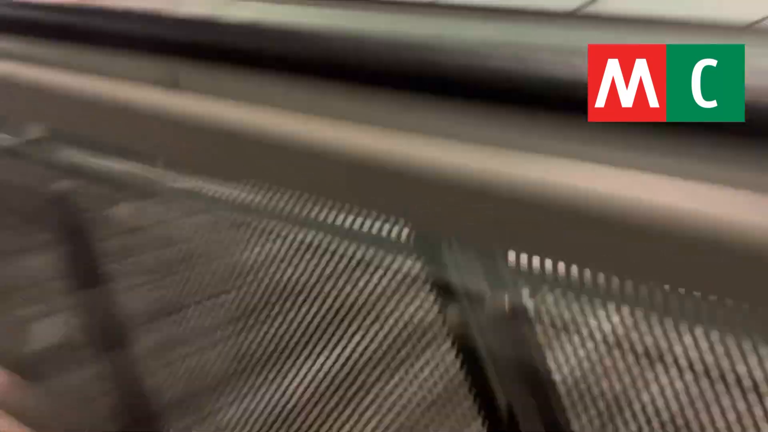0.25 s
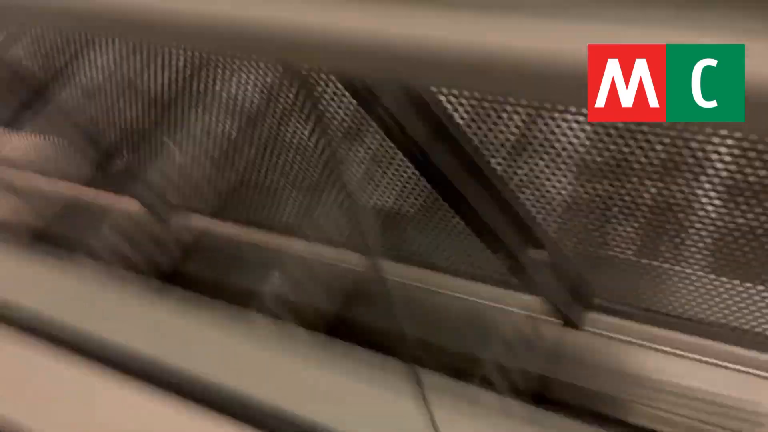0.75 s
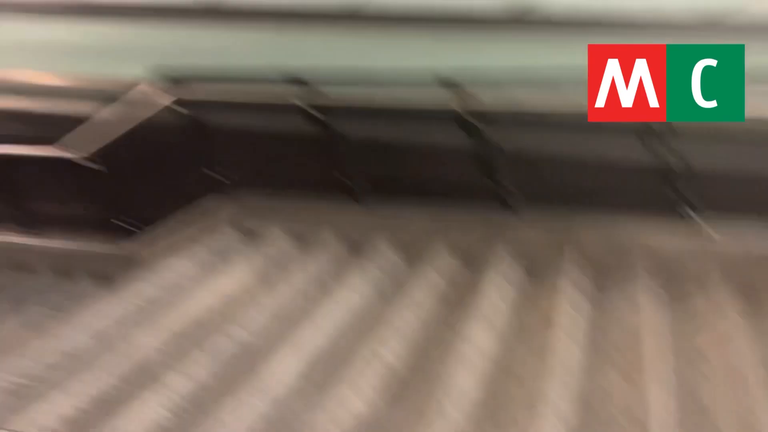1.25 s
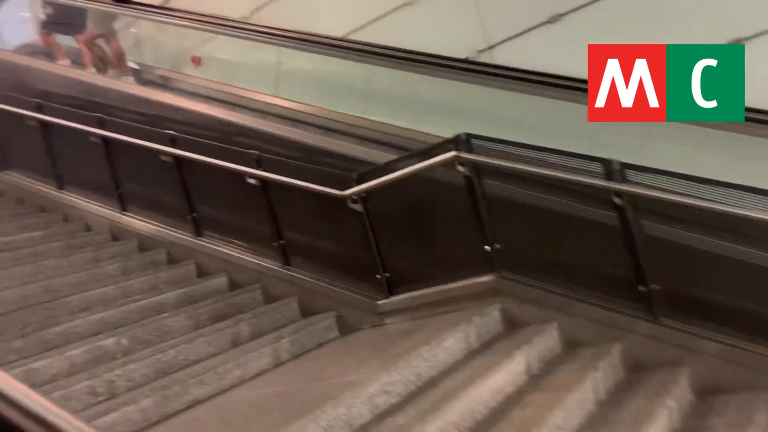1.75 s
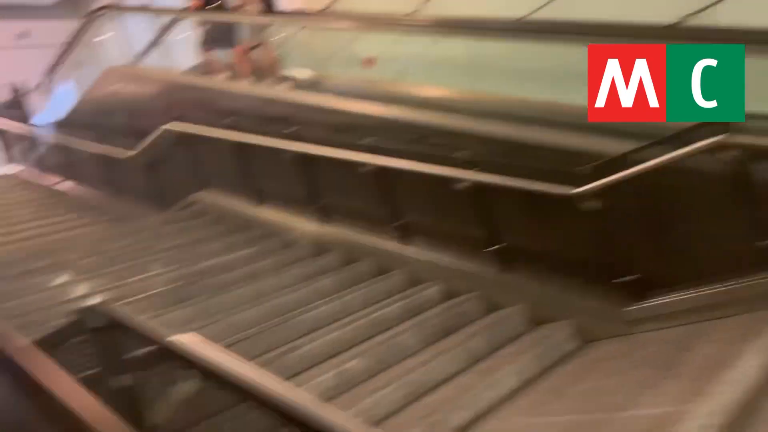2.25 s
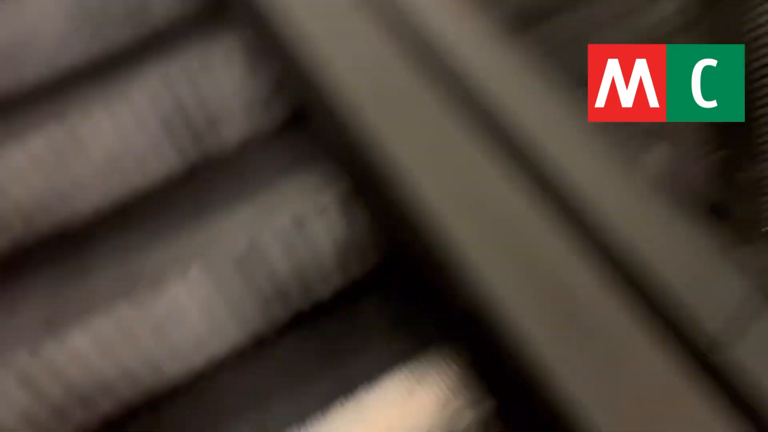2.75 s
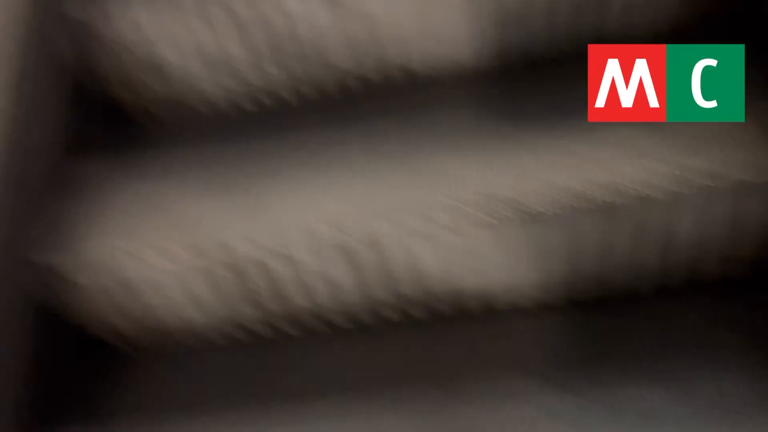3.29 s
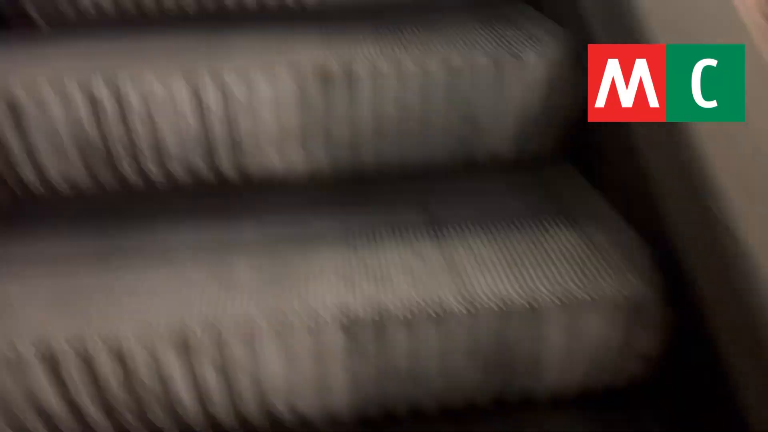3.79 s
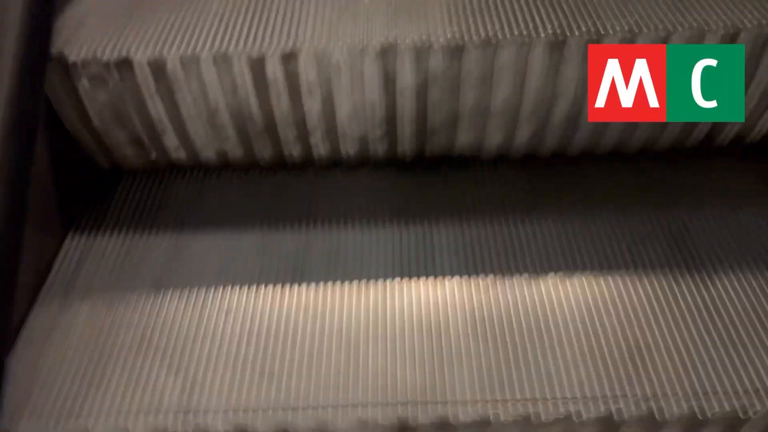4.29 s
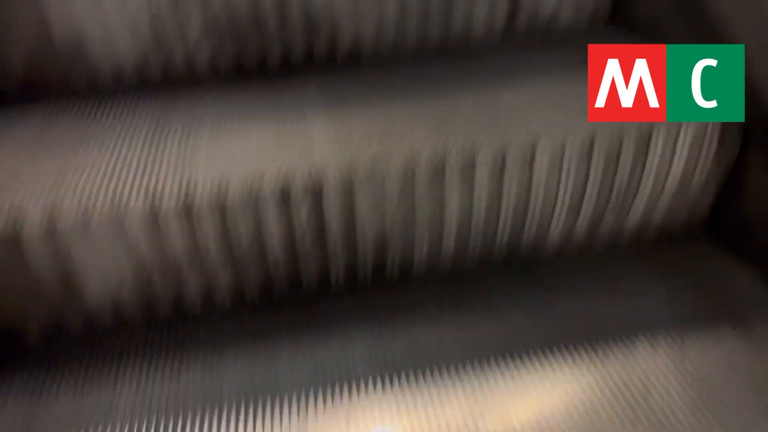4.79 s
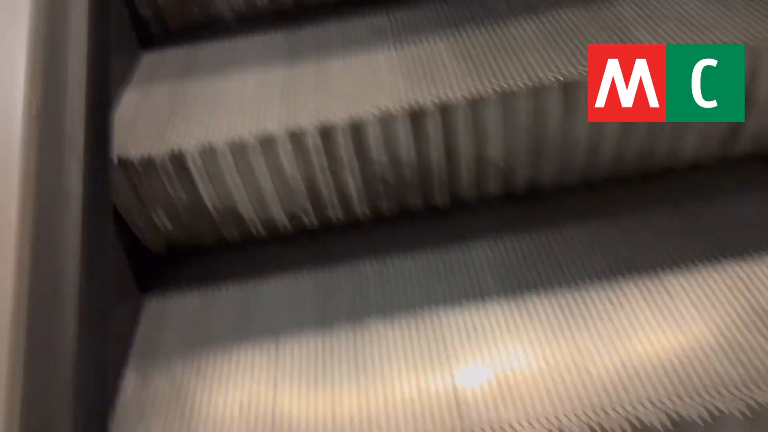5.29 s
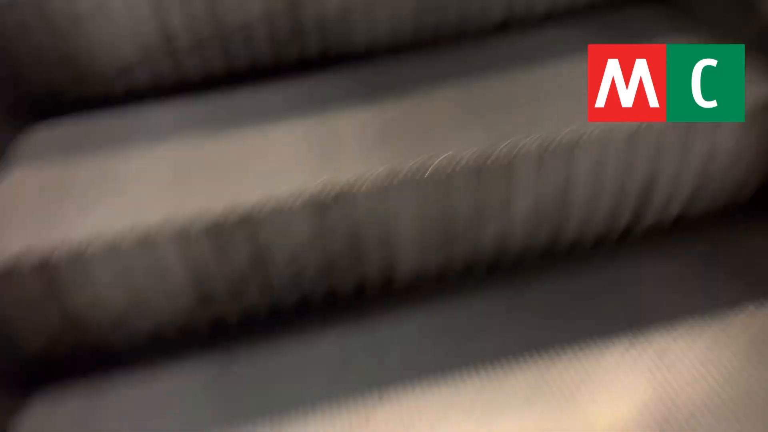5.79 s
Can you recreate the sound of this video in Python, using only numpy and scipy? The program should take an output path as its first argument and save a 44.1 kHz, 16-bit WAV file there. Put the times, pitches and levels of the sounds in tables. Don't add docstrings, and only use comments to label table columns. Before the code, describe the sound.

Close handheld stereo microphone beside, then on, a moving escalator. First come busy, irregular metal ticks over a low throbbing motor-like rumble, dull rolling noise and faint hiss. Then the ticks die away and the deep rumble swells, with isolated hollow metal knocks from the steps and brushes of fine grit. Two strong thuds ring low at the end, with a short dull hall echo.

```python
import sys
import numpy as np
from scipy import signal
from scipy.fft import rfft, irfft, next_fast_len
from scipy.io import wavfile
from scipy.ndimage import uniform_filter1d

SR = 44100
rng = np.random.default_rng(int(sys.argv[2]) if len(sys.argv) > 2 else 0)


def wrap_up_sound(samples):
    columns = np.atleast_2d(samples).T
    tamed = np.clip(columns, -1, 1)
    steps = np.round(tamed * 32767).astype(np.int16)
    wavfile.write(sys.argv[1], SR, steps)


def nominal_scale(level):
    x = np.asarray(level, float) / 20
    return 10 ** x


N = 266349
SIZE = next_fast_len(N + SR)
HZ = np.maximum(np.arange(SIZE // 2 + 1) * SR / SIZE, 1)

# time in seconds, level in dB.
LOAD = [(0, -26.5), (.3, -25), (.8, -24.5), (1.15, -28.5), (1.4, -23), (1.68, -33), (2.0, -28), (2.5, -25),
        (3.0, -22.5), (3.5, -21.5), (3.99, -23.5), (4.45, -18), (4.85, -22), (5.15, -20.5), (5.5, -21.5),
        (5.8, -21), (6.04, -22)]
LOAD_MEAN_DB = -23
# time in seconds, level in dB.
DRIVE_NEAR = [(0, -1), (.3, 2), (.8, 1), (1.2, -5), (1.5, -5), (2.0, -11), (2.3, -2.5), (6.04, -15)]
# start in seconds, peak in dB, colour near 550 Hz in dB,
# colour near 2 kHz in dB, left minus right in dB.
KNOCKS = [(0.1029, -28.5, -7, 3, -5), (0.1845, -17.5, 4, -21, -2.5), (0.1974, -27, -4, -3, -7),
          (0.212, -29, 2, 0, -4), (0.7043, -19.5, -9, -10, -4), (0.7238, -29, -12, -11, 0),
          (2.4294, -32.5, 9, -10, -6), (2.5047, -28, 3.5, -12, -5), (2.9996, -25.5, 3.5, -30, 3),
          (3.6716, -23.5, -12, -3, 1), (3.6808, -33.5, 2, 5, 4), (3.6944, -38, 11.5, 0, -4),
          (4.2121, -25.5, 1, -7, 3), (4.784, -30.5, 16.5, -13, -2), (4.8044, -28, 2, 2.5, 0),
          (5.3587, -9.5, 2.5, -15, -11), (5.3655, -12.5, 7, -9.5, 9.5), (5.39, -26.5, 9.5, -7, 0),
          (5.8469, -19.5, 2.5, 1, 1), (5.8549, -22.5, -6, 0.5, -4), (5.874, -29, 4, -5, 4)]


def rms_one(x):
    return x / np.sqrt(np.mean(x ** 2) + 1e-20)


def at_hz(points, hz, axis=1):
    points = np.array(points)
    return np.interp(np.log(hz), np.log(np.maximum(points[:, 0], 1)), points[:, axis])


def along(rows):
    s, db = np.transpose(rows)
    return np.interp(np.arange(N) / SR, s, db)


def swells(times, rise_db, half_s, slack=0):
    x = (np.arange(0, N + 40, 40) / SR - np.array(times)[:, None]) / np.reshape(half_s, (-1, 1))
    bell = np.exp(-x ** 2) * (1 - slack * x ** 2)
    total_db = (np.array(rise_db)[:, None] * bell).sum(0)
    return np.repeat(total_db, 40)[:N]


def drift(rate):
    r = np.exp(-80 * np.pi * rate / SR)
    chance = rng.standard_normal(N // 40 + 2002)
    slow = signal.lfilter([1], [1, -2 * r, r * r], chance)[2000:]
    return np.interp(np.arange(N) / 40, np.arange(len(slow)), rms_one(slow))


def diffuse(mid, other):
    # frequency in Hz, side minus mid in dB.
    width_rows = [(60, -20), (110, -16.5), (200, -7), (370, -5.5), (690, 1.5), (1260, 3), (1550, 4),
                  (1950, -6.5), (2800, -1), (4280, -2), (6000, 2), (8000, 0), (16000, 8.5)]
    # frequency in Hz, in-phase share, quarter-cycle share.
    port_rows = [(100, 0.058, -0.25), (400, 0, .3), (800, -0.082, .5), (1500, -0.16, .6), (2200, 0.37, -.3),
                 (4500, 0.27, -.3), (6000, 0.2, .2), (9000, 0, 0)]
    in_phase = np.clip(at_hz(port_rows, HZ), -.7, .7)
    quarter = np.clip(at_hz(port_rows, HZ, axis=2), -.45, .45)
    tied = in_phase + 1j * quarter
    side = nominal_scale(at_hz(width_rows, HZ)) * (tied * mid + np.sqrt(1 - np.abs(tied) ** 2) * other)
    return irfft(np.array([mid + side, mid - side]), SIZE)[:, :N]


def roar(spectrum, patchy_db, rate, count):
    mid, other = rfft(rng.standard_normal((2, SIZE))) * nominal_scale(at_hz(spectrum, HZ))
    place = np.interp(np.log(HZ), np.log([spectrum[1][0], spectrum[-1][0]]), [0, count - 1])
    out, together = 0, drift(rate)
    for k in range(count):
        share = np.clip(1 - np.abs(place - k), 0, 1)
        flicker = nominal_scale(patchy_db * (0.45 * together + drift(rate)))
        out = out + flicker * diffuse(share * mid, share * other)
    return out / np.sqrt(np.mean(out.mean(0) ** 2))


def evened(x, window_s, share):
    level = np.sqrt(uniform_filter1d(x.mean(0) ** 2, int(window_s * SR)) + .02)
    x = x / level ** share
    return x / np.sqrt(np.mean(x.mean(0) ** 2))


def truss():
    # frequency in Hz, density in dB per Hz.
    rumble_rows = [(15, -49), (27, -24), (38, -15), (50, -3.5), (62, 0), (74, 1), (86, -4), (100, -2),
                   (115, -10), (140, -17.5), (200, -40), (370, -100)]
    # time in seconds, rise in dB.
    heave_rows = [(.03, 7), (.22, 3), (1.09, 5.5), (1.24, 10), (1.31, 7), (1.75, 14), (3.82, 7), (4.09, 4),
                  (4.29, 5), (4.46, 4.5), (4.61, 3), (4.93, 7.5), (5.16, 3), (5.65, 2), (5.87, 6),
                  (5.95, 3)]
    heave_db = swells(*np.transpose(heave_rows), half_s=0.028, slack=1.5)
    rumble = roar(rumble_rows, patchy_db=0.0, rate=1.5, count=3)
    return nominal_scale(along(LOAD) + heave_db) * evened(rumble, window_s=0.088, share=0.71)


def shaking_db():
    knock, half_s = np.array(KNOCKS), 0.042
    rise_db = 1.5 + 0.07 * (knock[:, 1] - LOAD_MEAN_DB)
    return swells(knock[:, 0] + half_s, rise_db, half_s)


def rollers():
    # frequency in Hz, density in dB per Hz.
    rolling_rows = [(70, -13.5), (110, -3), (135, -0.5), (158, -2), (185, 0), (248, -5), (468, -8.5),
                    (562, -11.5), (801, -15), (985, -16.5), (1390, -22), (1930, -25.5), (2500, -38),
                    (5280, -120)]
    level_db = -26.5 + 0.05 * along(DRIVE_NEAR) + 0.78 * shaking_db()
    return nominal_scale(level_db) * roar(rolling_rows, patchy_db=1.18, rate=19.7, count=8)


def handrail():
    # frequency in Hz, density in dB per Hz.
    hiss_rows = [(1180, -21.5), (2000, -4.5), (3330, -8), (3810, -10), (4130, -7.5), (4330, -10),
                 (5780, -16.5), (8000, -20.5), (10400, -49), (17600, -120)]
    level_db = -46 + 0.13 * (along(LOAD) - LOAD_MEAN_DB) + shaking_db()
    return nominal_scale(level_db) * roar(hiss_rows, patchy_db=1.0, rate=22.0, count=5)


def comb():
    # frequency in Hz, density in dB per Hz.
    grit_rows = [(5000, -34), (7500, -1.5), (9000, 3), (11000, -6), (12500, -2.5), (14000, -5.5),
                 (15700, -8), (16500, -43)]
    # time in seconds, rise in dB, half length in seconds.
    brush_rows = [(1.09, 2, .02), (2.47, 6, 0.017), (3.5, 0.5, 0.045), (3.72, 5, .05), (3.824, 5, .04),
                  (4.09, 3, .04), (4.237, 2, 0.045), (4.61, 2, .03), (4.76, 2.5, .06), (4.932, 5.5, 0.12),
                  (5.1, 4, 0.071), (5.62, 10, .015), (5.948, 3.5, 0.17)]
    extra_db = along(LOAD) - LOAD_MEAN_DB
    level_db = -63.5 + 0.39 * extra_db + swells(*np.transpose(brush_rows))
    return nominal_scale(level_db) * roar(grit_rows, patchy_db=-0.8, rate=5, count=4)


def distant_boom():
    # frequency in Hz, density in dB per Hz.
    boom_rows = [(15, -45), (27, -16), (36, -6), (46, 4), (56, -8), (80, -41), (300, -150)]
    boom = roar(boom_rows, patchy_db=2.0, rate=1.5, count=2)
    return nominal_scale(-33) * evened(boom, window_s=.1, share=0.66)


def hums():
    # frequency in Hz, width in Hz, level in dB.
    casing_rows = [(180.3, 16, -36.5), (474.4, 25, -44), (903, 42, -43.5), (4010, 21, -60.5),
                   (4230, 60, -71)]
    out = 0
    for hz, width, level_db in casing_rows:
        shape = 1 / (1 + ((HZ - hz) / width * 2) ** 2)
        tone = diffuse(*rfft(rng.standard_normal((2, SIZE))) * shape)
        out = out + nominal_scale(level_db + 2.0 * drift(3.3)) * rms_one(tone)
    return out


def strikes(times, pan_db, colour_hz, colour_db, decays, modes, rattle_s, count):
    length = 6000
    out, span = np.zeros((2, N + length)), np.arange(length) / SR
    own_hz, own_db = np.transpose(modes)
    draws = rng.random((len(times), 4, count + len(modes)))
    for s, pan, levels_db, (place, delay, turn, lean) in zip(times, pan_db, colour_db, draws):
        step = (np.arange(count) + place[:count]) / count
        crowd = colour_hz[0] * (colour_hz[-1] / colour_hz[0]) ** step
        hz, extra_db = np.r_[crowd, own_hz], np.r_[np.zeros(count), own_db]
        t60 = at_hz(decays, hz) * np.r_[np.ones(count), 1.4 + 0 * own_hz]
        wait_s = rattle_s * delay ** 2.89 * (700 / hz) ** 0.62
        age = np.maximum(span - wait_s[:, None], 0)
        size = nominal_scale(np.interp(np.log(hz), np.log(colour_hz), levels_db) + extra_db)[:, None]
        rings = size * nominal_scale(-60 * age / t60[:, None]) * np.minimum(age / 0.00015, 1)
        start = round(s * SR)
        for ear in (1, -1):
            phase = 2 * np.pi * (hz[:, None] * age + (turn + .22 * ear * lean)[:, None])
            heard = nominal_scale(ear * np.clip(pan, -8, 8) / 2) * (rings * np.sin(phase)).sum(0)
            out[(1 - ear) // 2, start:start + length] += heard
    return out[:, :N]


def cracks(times, level_db):
    clicks = np.zeros(N)
    clicks[np.round(times * SR).astype(int)] = nominal_scale(level_db)
    band = signal.butter(3, [900, 4000], "band", fs=SR, output="sos")
    return signal.sosfilt(band, clicks + 1e-18)


def teeth():
    # frequency in Hz, t60 in seconds.
    guide_decays = [(450, 0.034), (1000, 0.048), (2000, 0.06), (3500, 0.029), (7000, 0.019)]
    # frequency in Hz, level over the crowd in dB.
    guide_modes = [(900, -3.5), (3300, -2)]
    # start in seconds, peak in dB,
    # colour near 2 kHz, near 3.5 kHz and near 7 kHz in dB.
    worn_rows = [(0.106, -21.5, -16, -20, -24), (.283, -16.5, -14, -14.5, -32), (.462, -24, -2, -16, -28),
                 (.545, -18.5, -14, -17, -11.5), (.636, -16, -15, -20, -25), (.769, -20.5, -15, -24, -31),
                 (.811, -14.5, -16, -19, -26), (.897, -22, -6.5, -21, -26), (1.073, -22, -8, -9, -18),
                 (1.121, -21.5, -8, -15, -36), (1.193, -23, -13, -15, -19), (1.247, -29.5, 0, 5, -32),
                 (1.296, -21.5, -11, -18, -32), (1.332, -21.5, -14, -14, -38),
                 (1.38, -21.5, -20, -7.5, -34), (1.422, -18, -8.5, -12, -34), (1.47, -17.5, -12, -6.5, -35),
                 (1.555, -27, -6, -25, -22), (1.597, -22, -14, -26, -31), (1.646, -16, -18, -17, -40),
                 (1.824, -25, -12, -7, -37), (1.894, -19, -16, -25, -32), (1.909, -24, -9, -12, -33),
                 (2.001, -24.5, -10, -10, -31)]
    usual_colour_db = [-12.5, -21.5, -28.5]
    teeth_per_s, tooth_count = 22.74, 56
    worn, chance = np.array(worn_rows), rng.standard_normal((tooth_count, 6))
    s = .063 + np.arange(tooth_count) / teeth_per_s + .002 * chance[:, 0]
    peak_db = -24 + np.interp(s, *np.transpose(DRIVE_NEAR)) + 2.5 * chance[:, 1]
    rows = np.c_[s, peak_db, usual_colour_db + 5.5 * chance[:, 2:5]]
    free = np.abs(s[:, None] - worn[:, 0]).min(axis=1) > .5 / teeth_per_s
    s, peak_db, mid_db, bright_db, top_db = np.r_[worn, rows[free]].T
    pan_db = 3.5 * rng.standard_normal(len(s)) - 1.0
    colour_hz = [400, 950, 2000, 3500, 6500, 9500]
    colour = peak_db - 7.0 + np.array([-6 + 0 * s, 0 * s, mid_db, bright_db, top_db, top_db - 8])
    body = strikes(s, pan_db, colour_hz, colour.T, guide_decays, guide_modes, rattle_s=0.00267, count=26)
    return body + cracks(s, peak_db + bright_db + 14.5)


def knocks():
    # frequency in Hz, t60 in seconds.
    step_decays = [(350, 0.11), (600, .13), (1200, 0.066), (2000, 0.058), (3300, 0.12), (8000, .05)]
    # frequency in Hz, level over the crowd in dB.
    plate_modes = [(522, 6.5), (612, 5), (651, 8), (905, 9.5), (1075, 7), (1290, 6), (1450, 6.5),
                   (1655, 9.5), (2003, 7.5), (2330, 6), (2490, 1), (2700, 5), (3110, 0)]
    s, peak_db, low_db, mid_db, pan_db = np.transpose(KNOCKS)
    bright_db = -14 - 0.32 * (peak_db - LOAD_MEAN_DB)
    colour_hz = [380, 560, 780, 1250, 1950, 3200, 5500, 11000]
    colour = peak_db - 13.0 + np.array([low_db - 3.5, low_db, low_db - 13.0, 0 * s, mid_db,
                                        bright_db, bright_db - 8, bright_db - 22])
    snap = cracks(s, peak_db + .4 * mid_db + 8)
    return snap + strikes(s, pan_db, colour_hz, colour.T, step_decays, plate_modes, rattle_s=.005, count=60)


def hall(x):
    t60_s, level_db, cut_hz = 0.54, -22.5, 2900
    t = np.arange(SR) / SR
    tail = rng.standard_normal((2, SR)) * nominal_scale(-60 * t / t60_s) * np.clip(t / 0.011, 0, 1)
    tail /= np.sqrt(np.sum(tail ** 2, axis=1, keepdims=True))
    dull = 1 / (1 + 1j * HZ / cut_hz)
    return nominal_scale(level_db) * irfft(rfft(x.mean(0), SIZE) * rfft(tail, SIZE) * dull, SIZE)[:, :N]


def ring(drive, hz, t60):
    r, w = nominal_scale(-60 / (t60 * SR)), 2 * np.pi * hz / SR
    return signal.lfilter([0, np.sin(w)], [1, -2 * r * np.cos(w), r * r], drive + 1e-18)


def thumps():
    # start in seconds, peak in dB.
    thump_rows = [
        (5.37, -7),
        (5.865, -6.5),
    ]
    push = np.zeros(N)
    for s, peak_db in thump_rows:
        push[round(s * SR)] = nominal_scale(peak_db)
    soft = signal.lfilter([.004], [1, -.996], push) * 1.3
    rebound = np.r_[np.zeros(240), soft[:-240]] * 0.52
    return ring(soft - rebound, 97.2, 0.36)


def scene():
    steady = truss() + rollers() + handrail() + comb() + distant_boom() + hums()
    contacts = teeth() + knocks()
    return steady + contacts + hall(contacts) + thumps()


def top_cut(x):
    return signal.sosfilt(signal.butter(12, 15800, fs=SR, output="sos"), x)


def record(dry):
    # frequency in Hz, gain in dB.
    sum_rows = [(8000, 0), (8700, 1), (9400, -13.5), (10200, -12), (11200, 6.5), (13800, 4.5), (15000, 0),
                (15600, -24)]
    # frequency in Hz, gain in dB.
    difference_rows = [(5800, -2), (6600, -11), (7300, -19), (8000, -1.5), (11300, 5), (12600, -17),
                       (13300, -28), (14100, -7), (15600, 1)]
    mid, side = rfft(np.array([dry[0] + dry[1], dry[0] - dry[1]]) / 2, SIZE)
    mid = mid * nominal_scale(at_hz(sum_rows, HZ))
    side = side * nominal_scale(at_hz(difference_rows, HZ))
    ports = irfft(np.array([mid + side, mid - side]), SIZE)[:, :N]
    return top_cut(0.95 * np.tanh(ports / 0.95))


dry = scene()
out = record(dry)
wrap_up_sound(out)
```